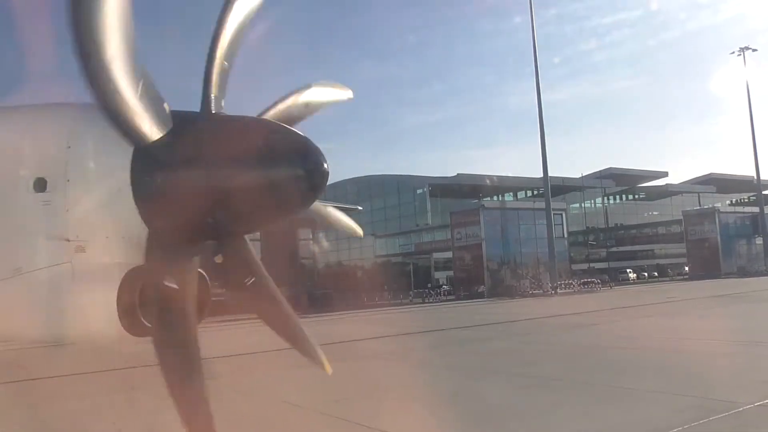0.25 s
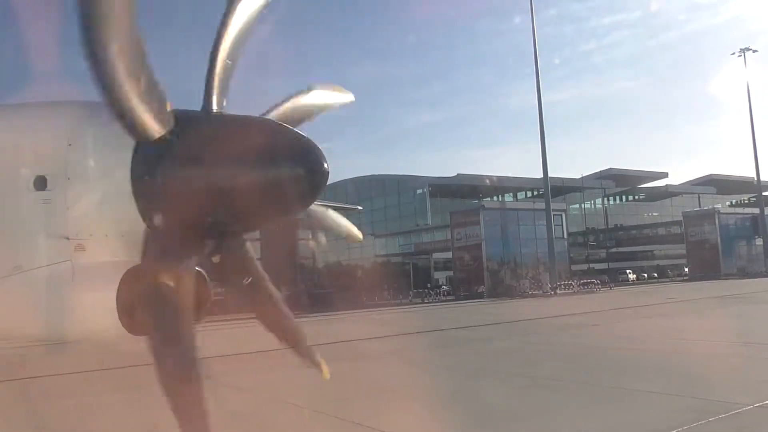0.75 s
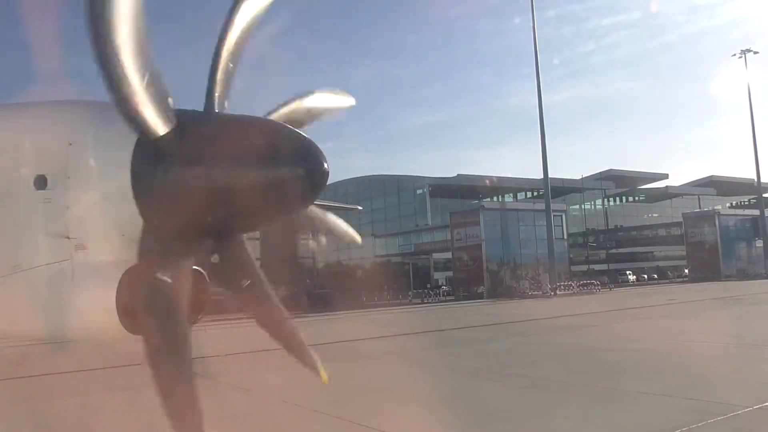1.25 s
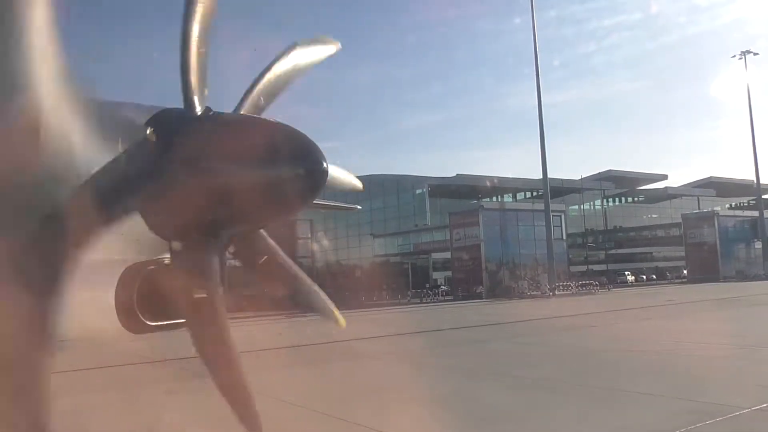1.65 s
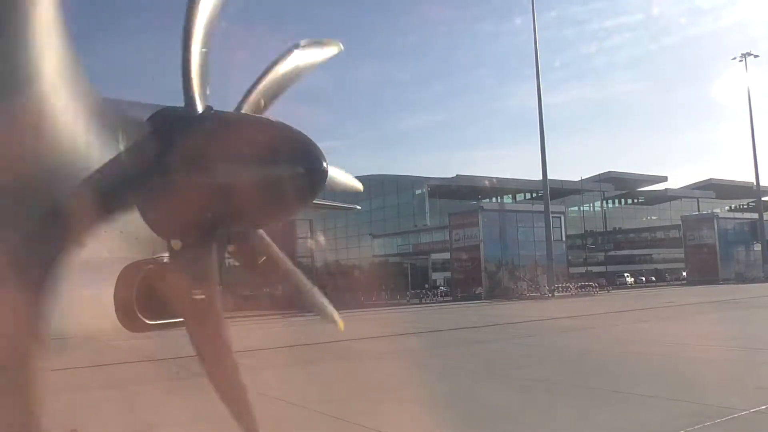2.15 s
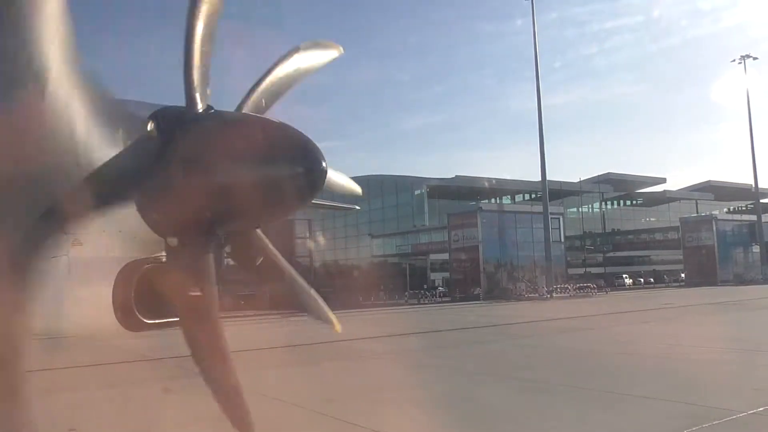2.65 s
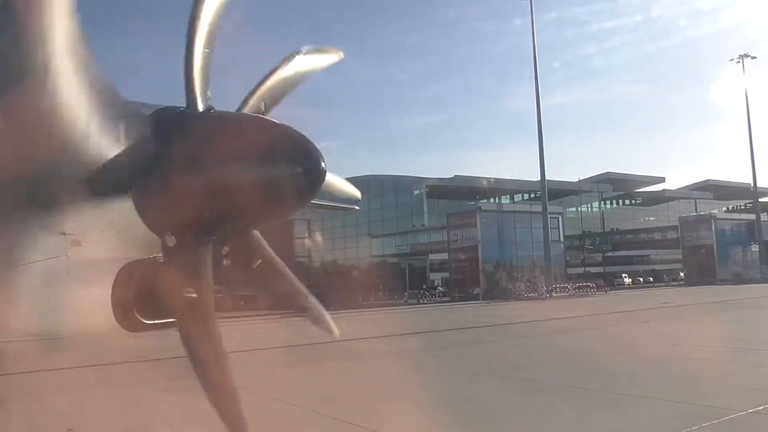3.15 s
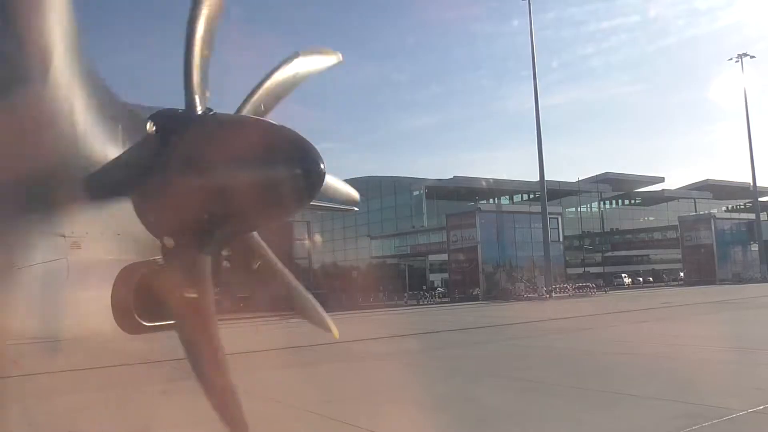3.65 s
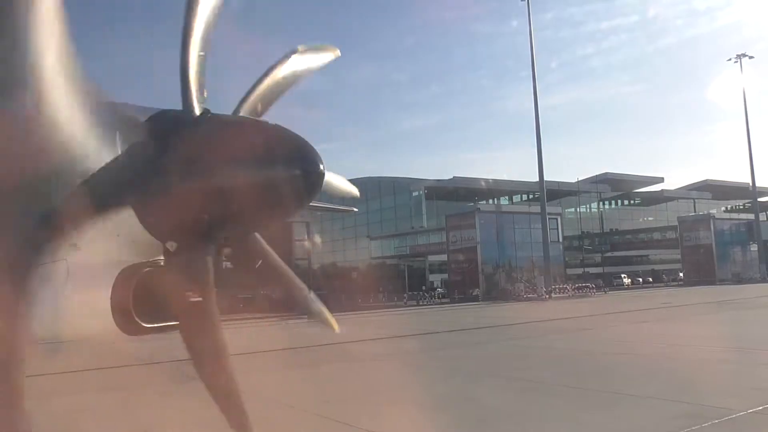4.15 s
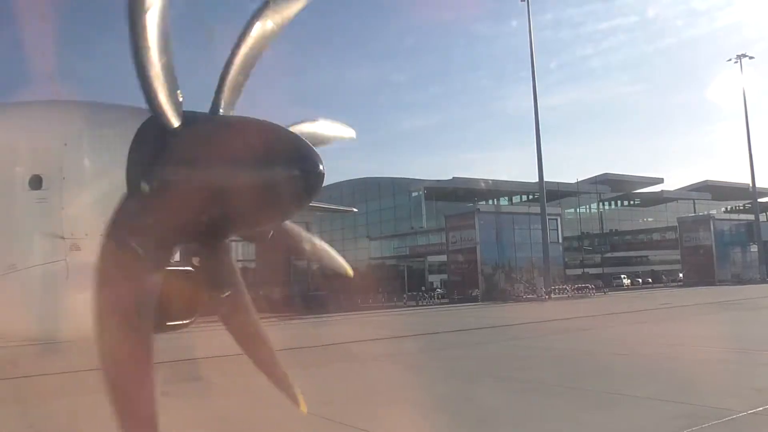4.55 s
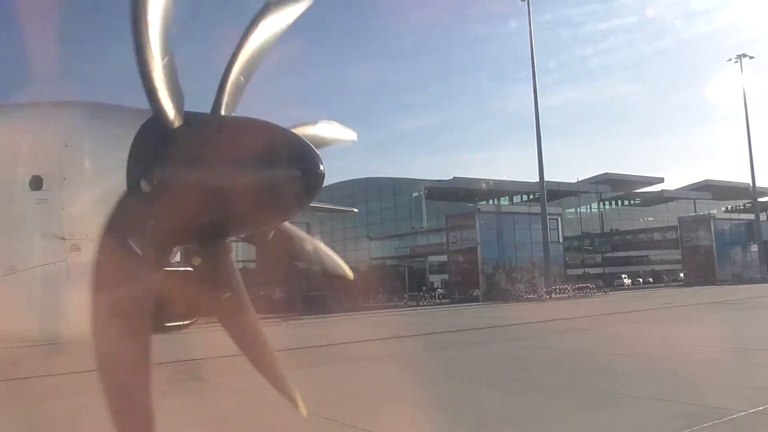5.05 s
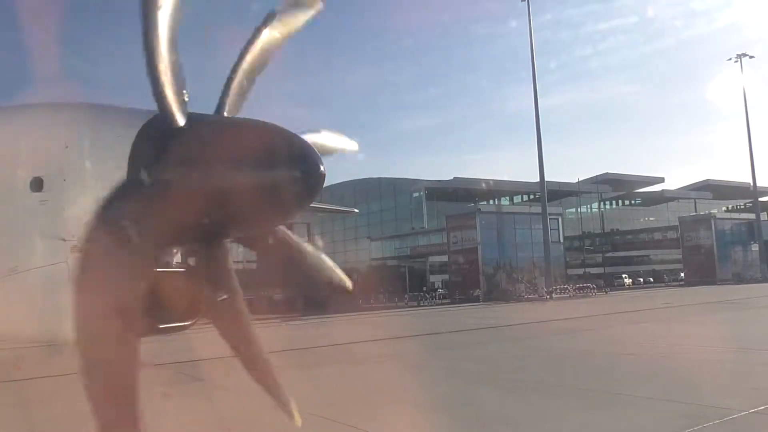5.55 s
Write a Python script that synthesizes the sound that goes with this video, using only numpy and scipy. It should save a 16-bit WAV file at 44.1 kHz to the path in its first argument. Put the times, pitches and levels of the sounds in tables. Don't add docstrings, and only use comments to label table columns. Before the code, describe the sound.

Inside a small aircraft cabin, an idling turboprop produces a loud, dense low hum and muffled roar that wavers throughout. Single low tones swell briefly. Soft vent air hisses underneath with a very faint turbine whine. Close to the stereo microphone, paper crinkles, with sharper snaps around 0.7 and 1 second, and an occasional tiny overload tick.

```python
import sys
import numpy as np
from scipy import signal
from scipy.fft import rfft, irfft, next_fast_len
from scipy.io import wavfile
from scipy.ndimage import uniform_filter1d, minimum_filter1d

SR = 44100
rng = np.random.default_rng(int(sys.argv[2]) if len(sys.argv) > 2 else 0)


def materialize(psi):
    bounded = np.clip(np.atleast_2d(psi).T, -1, 1)
    quanta = np.round(bounded * 32767).astype(np.int16)
    wavfile.write(sys.argv[1], SR, quanta)


def gain_from_decibels(decibels):
    exponent = np.asarray(decibels, float) / 20
    return 10 ** exponent


N = 256220
PAD = next_fast_len(N)
HZ = np.arange(PAD // 2 + 1) * SR / PAD + 1e-3
TIME_S = np.arange(N) / SR

# (frequency [Hz], likeness [0-1], left over right [dB])
PORT_BALANCE = [(30, .9, 2.5), (55, 1, .4), (267, 0.97, -.5), (283, 0.5, 0.5), (300, 0.99, -1),
                (376, .92, 3), (390, 1, -1.5), (815, 0.84, -4), (950, 0.1, -4.5), (990, 0.8, -1.5),
                (1580, 0, -4.5), (2350, 0.8, 3.5), (3400, .5, -4), (4230, 0.1, 2.5), (5000, 0.4, 0),
                (15000, 0.1, 0.5)]
# (frequency [Hz], left lead [rad])
PORT_LEAD = [(40, -.22), (260, -.08), (300, -.4), (400, -.6), (600, -.1), (780, .2), (860, -.6), (950, .2),
             (1300, .7), (1500, 3), (1700, .8), (2300, -.2), (3200, .9), (3900, 3.1), (4500, 6.3),
             (7400, 7.3), (9000, 9.8), (15000, 12.3)]
RANGE_EDGES_HZ = [0, 150, 285, 480, 1700]
SWING_SHARES = [1, 1, 1, .4]
# (time [s], level [dB])
WASH_LEVEL_DB = [(0.0, -9.5), (0.1, -14.5), (0.34, -11), (1.7, -12), (1.73, -6), (1.88, -15), (1.92, -8.5),
                 (1.96, -12), (2.64, -12), (2.67, -14.5), (2.94, -8), (3.09, -17), (3.12, -11.5), (5.61, -11.5),
                 (5.66, -15.5), (5.71, -7), (5.74, -18.5), (5.81, -10.5)]
# (frequency [Hz], density [dB per Hz])
WALL_ROAR = [(20, -79.5), (45, -73.5), (62, -52), (100, -48.5), (280, -42), (450, -45.5), (520, -51),
             (700, -55), (1000, -62), (1400, -71.5), (1750, -85), (2800, -96), (6000, -110)]
# (frequency [Hz], width [Hz], density [dB per Hz])
STANDING_WAVES = [(65.7, 5, -39.5), (114, 25, -43), (125.2, 14.2, -33.5), (162, 13, -42.5),
                  (192.9, 14, -35), (207, 12, -41), (231.4, 21, -38), (254.2, 14.2, -31.5), (307, 17, -40),
                  (320.4, 17, -35.5), (354, 29, -38), (388.2, 20, -32.5), (417.1, 39.3, -35.5),
                  (454, 35, -45), (573, 51, -54.5), (773, 119, -51.5), (2140, 350, -85)]
# (multiple of shaft rate [1], level [dB rms], flutter [dB])
SHAFT_ORDERS = [(2.5, -66.5, 5.5), (3, -56.5, 5), (4, -34, 4), (5, -45.5, 9.5), (6, -34, -3),
                (10, -37.5, 5.5), (12, -34, -4.5)]
# (frequency [Hz], width [Hz], level [dB rms], left over right [dB])
WHINES = [(4240, 200, -78, 2), (4193, 18, -77.5, 2.5), (7634, 30, -85, 0.5), (9082, 20, -87, 4.5),
          (9500, 30, -86, 0.5), (11509, 30, -87.5, 0.5), (12021, 30, -86.5, -1.5), (13281, 30, -91.5, 0)]
# (frequency [Hz], density [dB per Hz])
VENT_HISS = [(1470, -30.5), (2500, -3.5), (3890, -3.5), (4290, -3.5), (5650, -10.5), (10600, -10.5),
             (12600, -17), (14800, -29.5), (15400, -36.5)]
# (time [s], level [dB])
VENT_LEVEL = [(0.0, -61.5), (0.84, -61.5), (1.29, -61.5), (2.14, -60), (3.01, -60.5), (3.67, -59),
              (5.37, -59.5), (5.52, -62), (5.81, -63)]
# (frequency [Hz], density [dB per Hz])
PAPER_COLOUR = [(1500, -20), (2500, -6.5), (3460, -1), (4500, -4.5), (5300, -8), (6200, -9), (7300, -2.5),
                (9250, -2), (12600, -5.5), (13500, -11.5), (15500, -15)]
# (time [s], hold [s], level [dB])
PAPER_RUBS = [(0.201, .2, -62), (0.583, .04, -63), (0.736, .04, -56), (0.963, 0.058, -58),
              (1.65, 0.062, -57), (1.743, .03, -60), (2.077, 0.1, -56.5), (2.336, .02, -62),
              (2.566, 0.32, -62.5), (3.142, .12, -58.5), (3.344, .02, -63), (3.586, .15, -62.5),
              (4.217, .1, -64.5), (4.654, .1, -59.5), (4.85, .03, -61), (5.002, .12, -61.5),
              (5.277, 0.13, -63.5), (5.699, .02, -62)]
# (time [s], peak [dB], t60 [s], sheet resonance [Hz])
PAPER_SNAPS = [(.6, -48, 0.077, 8060), (0.735, -26, .09, 11000), (.975, -49, .24, 7600),
               (1.003, -28.5, .1, 5680), (1.656, -47.5, 0.29, 7130), (1.69, -48.5, .1, 9000),
               (1.745, -45.5, .15, 7270), (2.09, -47, .2, 5000), (2.15, -47, .3, 7300),
               (2.2, -48, .15, 7470), (2.333, -41.5, .13, 3500), (2.57, -50.5, 0.19, 7500),
               (3.142, -44.5, 0.27, 4560), (3.24, -48.5, .15, 8000), (3.345, -39.5, .12, 3500),
               (4.848, -43, .13, 4620), (5.07, -48.5, .15, 8500), (5.105, -48.5, .1, 9960)]
# (time [s], frequency [Hz], level [dB], length [s])
PAPER_CREAKS = [(.692, 5100, -49, .003), (.925, 5300, -56, .012), (.742, 3500, -49, .007),
                (.74, 13600, -41, .006), (1.012, 14500, -43, .01), (1.012, 2800, -47, .009),
                (2.345, 2300, -53, .01), (3.352, 2200, -50, .008), (4.858, 2600, -53, .01),
                (5.717, 4800, -56, .002)]
# (time [s], frequency [Hz], length [s], level [dB rms])
MODE_SURGES = [(.02, 319, .06, -19), (.5, 191, 0.09, -24.5), (.8, 190.1, .06, -16.5), (1.55, 64, .1, -27.5),
               (1.65, 256, 0.11, -17), (1.8, 192, 0.1, -18.5), (1.92, 126, 0.075, -18),
               (2.25, 312, 0.096, -16.5), (2.53, 192.6, 0.095, -16), (2.6, 64.1, 0.21, -23.5),
               (2.97, 122.1, .1, -16.5), (3.1, 310.6, 0.069, -21), (3.27, 123, 0.04, -17.5),
               (3.5, 64.6, 0.14, -29.5), (4.25, 200, 0.044, -17), (4.55, 256.7, 0.047, -16),
               (4.95, 64, .08, -26), (5.45, 63.4, 0.13, -24)]
# (time [s], left [dB], right [dB])
PORT_OVERLOADS = [
    (0.308, -38, -13),
    (1.9284, -20, -25),
    (2.5017, -20, -28.5),
    (3.672, -30, -34),
    (3.7528, -21, -20),
    (5.715, -40, -13),
]


def rms_one(x):
    return x / np.sqrt(np.mean(x ** 2) + 1e-20)


def in_time(rows):
    s, *columns = np.transpose(rows)
    return [np.interp(TIME_S, s, c) for c in columns]


def over_hz(rows):
    hz, *columns = np.transpose(rows)
    return [np.interp(np.log(HZ), np.log(hz), c) for c in columns]


def to_wave(spectra):
    return irfft(spectra, PAD)[..., :N]


def drift(rate_hz):
    knots = rng.standard_normal(400)
    wander = np.interp(TIME_S * rate_hz, np.arange(400), knots)
    return rms_one(uniform_filter1d(wander, 2000))


def at_ports(direct, diffuse):
    likeness, balance_db = over_hz(PORT_BALANCE)
    likeness = np.clip(likeness, 0, 1)
    lead_rad, = over_hz(PORT_LEAD)
    shared = np.sqrt((1 + likeness) / 2) * rfft(direct, PAD)
    apart = np.sqrt((1 - likeness) / 2) * rfft(diffuse, PAD)
    turn = gain_from_decibels(balance_db / 2) * np.exp(.5j * lead_rad)
    return np.array([(shared + apart) * turn, (shared - apart) / turn])


def field():
    return at_ports(*rng.standard_normal((2, N)))


def cabin_wash(evening=.55, memory_s=0.2):
    wall_db, = over_hz(WALL_ROAR)
    power = gain_from_decibels(2 * wall_db)
    for hz, width_hz, db in STANDING_WAVES:
        power = power + gain_from_decibels(2 * db) / (1 + (2 * (HZ - hz) / width_hz) ** 2) ** 2
    roar = field() * np.sqrt(power * SR / 2)
    wash_db, = in_time(WASH_LEVEL_DB)
    out = to_wave(roar * (HZ >= RANGE_EDGES_HZ[-1]))
    for low, high, share in zip(RANGE_EDGES_HZ, RANGE_EDGES_HZ[1:], SWING_SHARES):
        part = to_wave(roar * ((HZ >= low) & (HZ < high)))
        slow_power = uniform_filter1d(np.mean(part, 0) ** 2, int(memory_s * SR))
        steady = part * rms_one(slow_power ** (-evening / 2))
        out = out + steady * rms_one(gain_from_decibels(share * wash_db))
    return out


def propeller(shaft_hz=15.92):
    turns = np.cumsum(shaft_hz * (1 + 0.0017 * drift(0.85))) / SR
    hum = np.zeros(N)
    for multiple, db, flutter_db in SHAFT_ORDERS:
        level = np.sqrt(2) * gain_from_decibels(db + flutter_db * drift(3.6))
        hum += level * np.sin(2 * np.pi * (multiple * turns + rng.random()))
    return to_wave(at_ports(hum, 0 * hum))


def turbine():
    white = rfft(rng.standard_normal(N), PAD)
    out = np.zeros((2, N))
    for hz, width_hz, db, pan_db in WHINES:
        tone = to_wave(white / (1 + (2 * (HZ - hz) / width_hz) ** 2))
        pan = gain_from_decibels(np.array([[pan_db / 2], [-pan_db / 2]]))
        out += gain_from_decibels(db + 1.0 * drift(2.4)) * rms_one(tone) * pan
    return out


def vents(level_db=-58.5):
    hiss_db, = over_hz(VENT_HISS)
    hiss = to_wave(field() * gain_from_decibels(hiss_db))
    curve_db, = in_time(VENT_LEVEL)
    swing_db = 1.1 * (curve_db - curve_db.mean()) + .6 * drift(5.7)
    return gain_from_decibels(level_db + swing_db) * rms_one(hiss)


def rubbing(held_db=-65.5, attack_s=0.023, release_s=0.032):
    power = np.full(N, gain_from_decibels(2 * held_db))
    for s, hold_s, db in PAPER_RUBS:
        away = np.maximum((s - TIME_S) / attack_s, (TIME_S - s - hold_s) / release_s)
        power += gain_from_decibels(2 * db) * np.exp(-2 * np.maximum(away, 0))
    return np.sqrt(power)


def snap_ring(snap, ring_hz):
    b, a = signal.iirpeak(ring_hz, 4.0, SR)
    ring_db = 2 - 1.5 * np.log2(ring_hz / 5000)
    return gain_from_decibels(ring_db) * signal.lfilter(b, a, snap)


def creak(rub, hz, sharpness=6.3):
    b, a = signal.iirpeak(hz, sharpness, SR)
    return signal.lfilter(b, a, signal.lfilter(b, a, rub + 1e-18))


def paper(grains_per_s=5000, spread_db=2.0, snap_rise_s=0.0037, rise_share=.011, snap_longest_s=.12):
    sizes = gain_from_decibels(spread_db * np.minimum(rng.exponential(1, (2, N)), 5))
    sizes = sizes * rng.choice([-1, 1], (2, N))
    grains = rms_one(sizes * (rng.random((2, N)) < grains_per_s / SR))
    burst = grains * rubbing()
    for s, peak_db, t60_s, ring_hz in PAPER_SNAPS:
        at = slice(int(s * SR), int((s + min(t60_s, snap_longest_s)) * SR))
        since_s = TIME_S[at] - TIME_S[at][0]
        rise = np.minimum(since_s / (snap_rise_s + rise_share * t60_s), 1)
        snap = grains[:, at] * gain_from_decibels(peak_db - 10 - 60 * since_s / t60_s) * rise
        burst[:, at] += snap + snap_ring(snap, ring_hz)
    for s, hz, db, length_s in PAPER_CREAKS:
        rub = grains * np.exp(-((TIME_S - s) / length_s) ** 2)
        burst += gain_from_decibels(db + 11.5) * creak(rub, hz)
    colour = gain_from_decibels(over_hz(PAPER_COLOUR)[0])
    return to_wave(at_ports(*burst) * colour / np.sqrt(np.mean(colour ** 2)))


def surges():
    hum = np.zeros(N)
    for s, hz, length_s, db in MODE_SURGES:
        swell = np.exp(-((TIME_S - s) / length_s) ** 2)
        hum += np.sqrt(2) * gain_from_decibels(db) * swell * np.sin(2 * np.pi * hz * TIME_S)
    return to_wave(at_ports(hum, 0 * hum))


def overload_ticks(width_s=0.00014):
    out = np.zeros((2, N))
    for s, *ports_db in PORT_OVERLOADS:
        depth = gain_from_decibels(np.array(ports_db) - 4.5)[:, None]
        out -= depth * np.exp(-((TIME_S - s) / width_s) ** 2)
    return out


def scene():
    return cabin_wash() + propeller() + turbine() + vents() + paper() + surges() + overload_ticks()


def top_cut(x):
    return signal.sosfilt(signal.butter(12, 15600, fs=SR, output="sos"), x)


def record(dry):
    room = np.minimum(.98 / (np.abs(dry).max(0) + 1e-9), 1)
    held = minimum_filter1d(room, size=1200)
    gain = uniform_filter1d(uniform_filter1d(held, size=600), size=600)
    return top_cut(dry * gain)


dry = scene()
out = record(dry)
materialize(out)
```